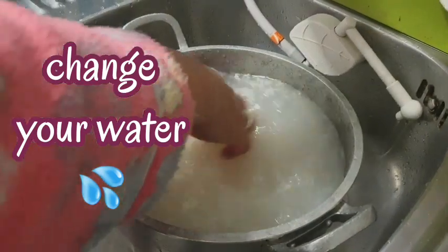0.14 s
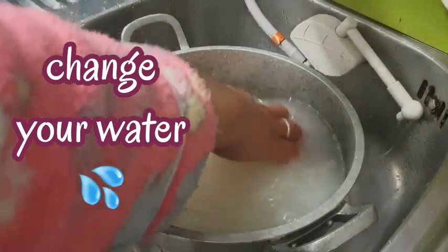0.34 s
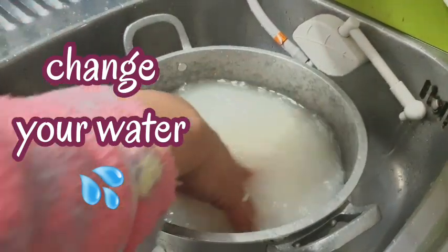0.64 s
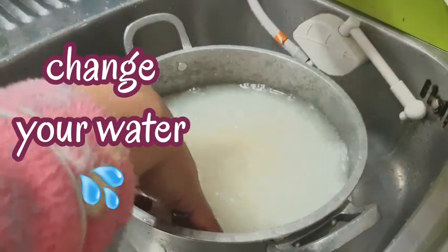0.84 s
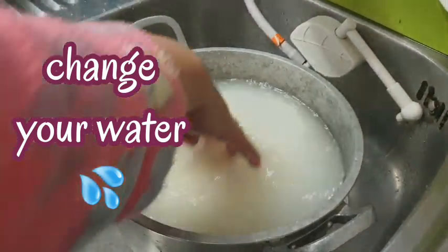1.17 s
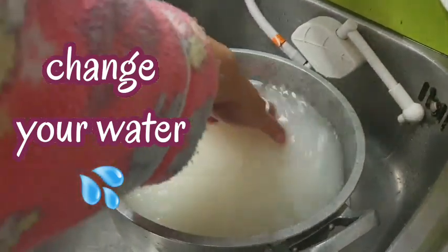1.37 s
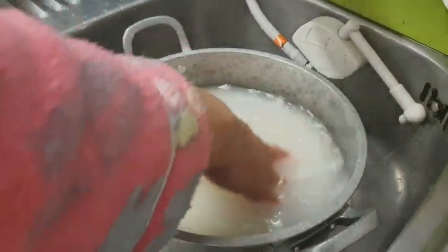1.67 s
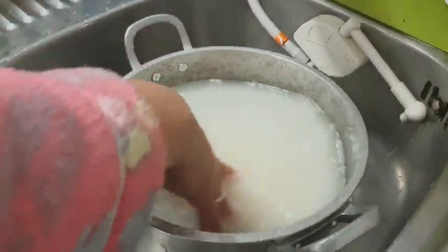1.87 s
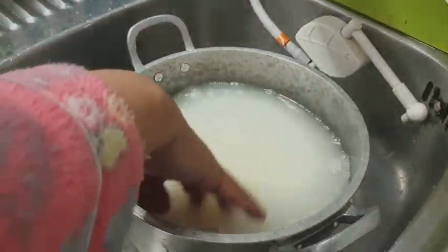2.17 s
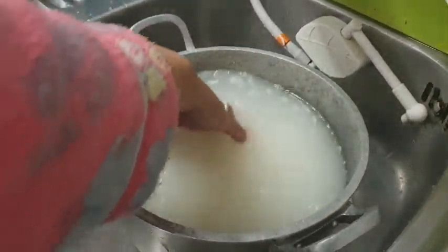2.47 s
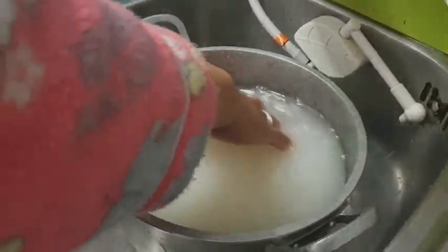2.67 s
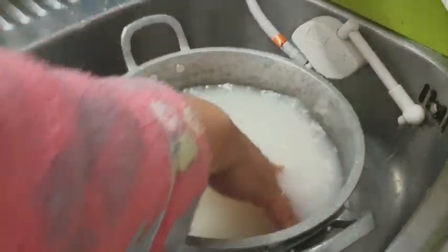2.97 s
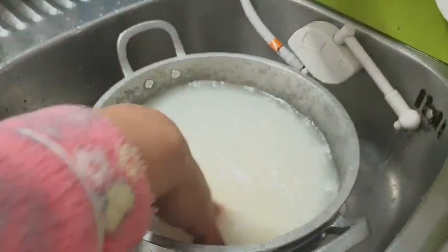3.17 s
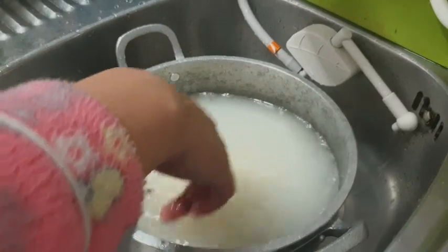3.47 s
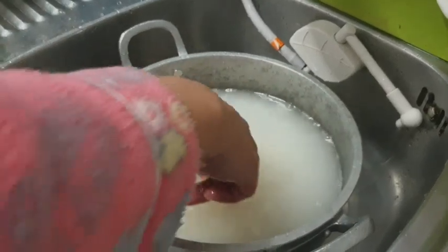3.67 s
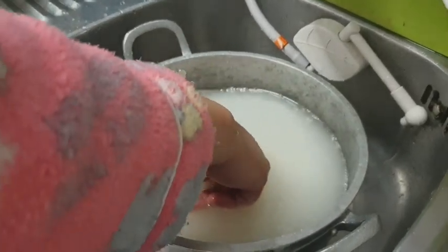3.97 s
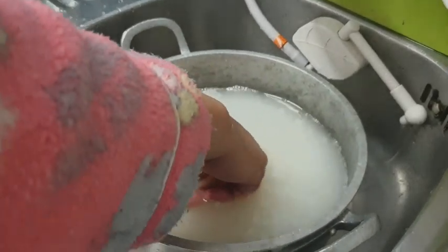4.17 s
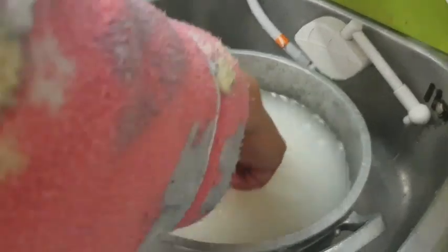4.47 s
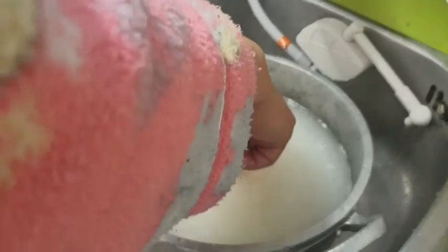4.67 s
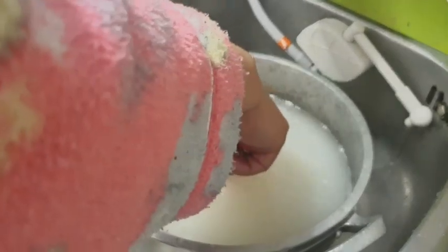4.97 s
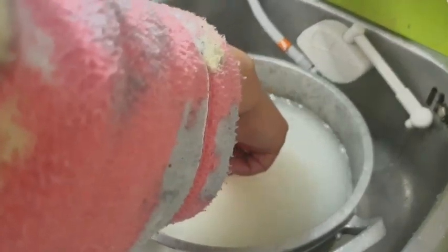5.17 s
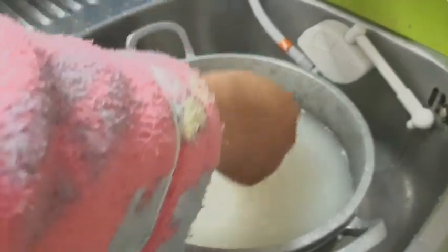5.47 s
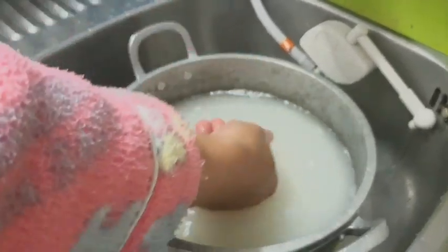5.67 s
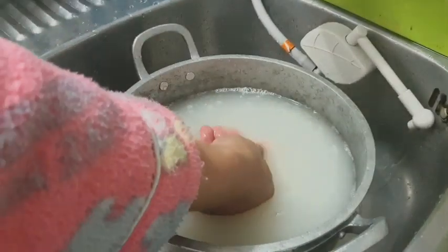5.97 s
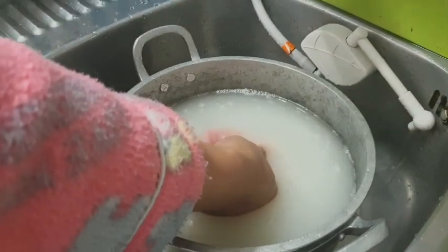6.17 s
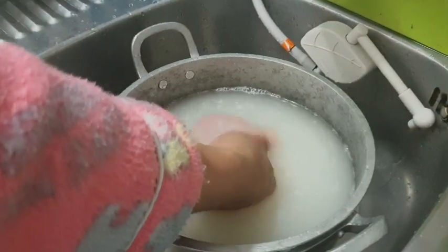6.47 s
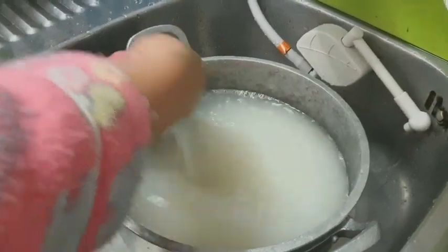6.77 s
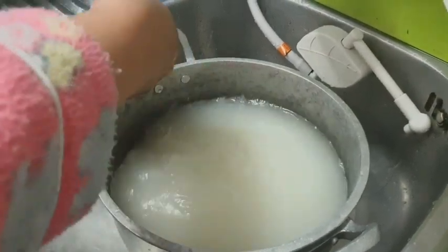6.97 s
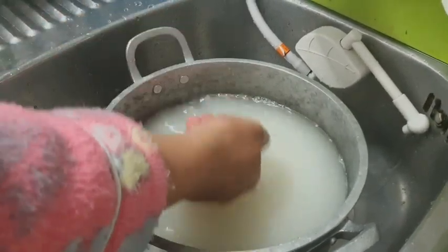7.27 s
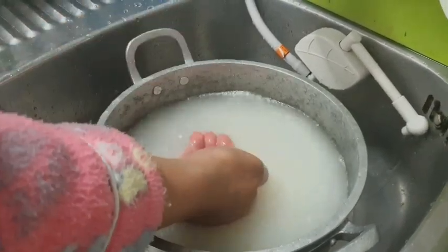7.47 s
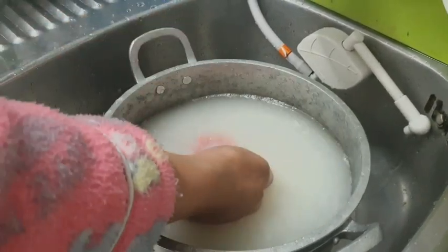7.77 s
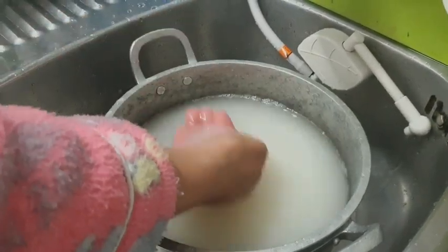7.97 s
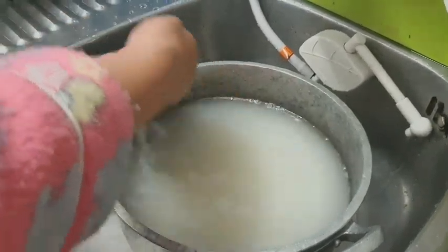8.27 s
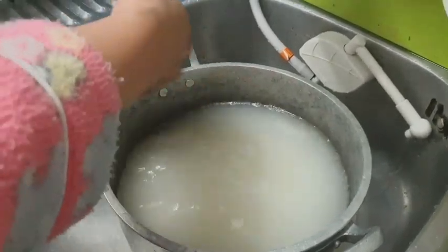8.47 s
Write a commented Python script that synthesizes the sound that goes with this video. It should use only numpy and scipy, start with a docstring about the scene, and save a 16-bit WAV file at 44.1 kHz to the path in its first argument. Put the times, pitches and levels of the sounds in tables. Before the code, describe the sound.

A hand stirs rice in a metal pot of water in a steel sink, heard close in a small kitchen. Quick irregular drops plink throughout over soft swishing and dull sink rumble. One sharp crack comes near the start, the middle is calmer with low thumps, then splashes cluster around seven seconds and a bright splash ends it.

```python
"""Kitchen: a hand stirs and squeezes rice in a metal pot of water in a steel sink, close to a two-port phone mic.
A steady trickle of drops plinks nearby (ringing bubbles) and thumps the sink (low modes).
Lifted handfuls splash (cracks, grainy noise, droplets) and spatter (more bubbles);
water swishes (flickering noise bands) over the hum of the kitchen (shaped noise)."""
import sys
import numpy as np
from scipy import signal
from scipy.fft import rfft, irfft
from scipy.io import wavfile
from scipy.ndimage import uniform_filter1d

SR = 44100
rng = np.random.default_rng(int(sys.argv[2]) if len(sys.argv) > 2 else 0)


def to_wav(sig):
    """Store sig (one row per channel, or 1-D mono) as 16-bit WAV at the path in sys.argv[1].

    Samples outside -1..1 are clipped; the rate is SR.
    """
    pcm = np.clip(np.atleast_2d(sig), -1, 1) * 32767
    pcm = np.round(pcm).astype(np.int16)
    wavfile.write(sys.argv[1], SR, pcm.T)  # frames by channels


N = 380141
TOP_HZ = 15900


def undb(db):
    """dB to amplitude."""
    return 10 ** (np.asarray(db) / 20)


def unit(x):
    """Scale to RMS 1."""
    return x / np.sqrt(np.mean(x ** 2))


def peak(x):
    """Scale to peak 1."""
    return x / np.max(np.abs(x))


def band(x, hz, width_hz):
    """Resonance of gain 1 at the centre."""
    return signal.lfilter(*signal.iirpeak(min(hz, .45 * SR), hz / width_hz, SR), x)


def between(x, lo_hz, hi_hz):
    """Butterworth bandpass."""
    return signal.sosfilt(signal.butter(2, [lo_hz, hi_hz], "bandpass", fs=SR, output="sos"), x)


def walk(rate_hz):
    """Random levels held 1 / rate_hz s and slewed; spread near 1."""
    k = int(SR / rate_hz)
    return uniform_filter1d(np.repeat(rng.standard_normal(N // k + 1), k), k)[:N]


def columns(table):
    """Interpolate each column over time."""
    s, *rest = np.transpose(table)
    return [np.interp(np.arange(N) / SR, s, c) for c in rest]


def add(track, s, sound):
    """Mix a sound in at s seconds."""
    i = int(s * SR)
    track[i:i + len(sound)] += sound[:max(N - i, 0)]


def fade(t60_s):
    """Time axis and exponential decay down to -60 dB."""
    t = np.arange(int(t60_s * SR)) / SR
    return t, np.exp(-np.log(1000) * t / t60_s)


def specks(rate_hz):
    """Sparse clicks of uneven size."""
    return (rng.random(N) < rate_hz / SR) * rng.standard_normal(N)


def bubble(hz, t60_s, rise, swell_s=0.00028):
    """Ringing air pocket: pitch climbs ever faster (rise = ln ratio) toward the surface, fading as it climbs."""
    t, decay = fade(t60_s)
    climb = np.exp(rise * (t / t[-1]) ** 2)
    whole = np.exp(-(climb - 1) ** 2)
    phase = 2 * np.pi * np.cumsum(np.minimum(hz * climb, .45 * SR)) / SR
    return np.sin(phase) * decay * whole * (1 - np.exp(-t / swell_s))


def hiss(db, top_db, low_hz, grain_rate_hz, grain_db, flicker_db):
    """Countless tiny surface bubbles: noise and specks, each band flickering mostly alone."""
    out, shared = 0, walk(40)
    for hz in low_hz * 2 ** np.arange(0, 2.1, .5):
        high = np.clip(np.log2(hz / 6500), 0, 1)
        source = rng.standard_normal((2, N)) + undb(grain_db) * unit(specks(grain_rate_hz))
        layer = unit(band(band(source, hz, hz / 2), hz, hz / 2))
        out = out + layer * undb(db + high * top_db + flicker_db * (shared / 2 + walk(60)))
    return out


def froth(db, rate_hz, level_db, low_hz):
    """Small bubbles over two octaves at random times, louder where db is higher."""
    out = np.zeros(N)
    for when, tone, size in rng.random((int(rate_hz * N / SR), 3)):
        hz = low_hz * 4 ** tone
        stir_db = db[int(when * N)]
        if stir_db > -90:
            add(out, when * N / SR, undb(stir_db + level_db + 14 * size) * bubble(hz, 35 / hz, .3))
    return out


BASIN_T60_S, BASIN_DB = 0.021, 5.5
ROOM_T60_S, ROOM_DB = 0.14, 0.5
RIGHT_LAG_S = .00009


def space(x, wet_db=0):
    """Direct sound, later at the right port, then basin echoes and room, different at each port."""
    response = np.zeros((2, SR // 2))
    for t60_s, db in ((BASIN_T60_S, BASIN_DB), (ROOM_T60_S, ROOM_DB)):
        decay = fade(min(t60_s, .48))[1]
        tail = rng.standard_normal((2, SR // 2))[:, :len(decay)] * decay
        response[:, 30:30 + len(decay)] += undb(db + wet_db) * tail / np.sqrt(np.sum(decay ** 2))
    response[0, 0] = 1
    response[1, :16] = np.sinc(np.arange(16) - RIGHT_LAG_S * SR)  # fractional delay
    return signal.fftconvolve(np.broadcast_to(x, (2, N)), response, axes=1)[:, :N]


# kitchen hum spectrum, relative: f/Hz, level/dB per Hz
KITCHEN_SPECTRUM = [(20, -10.5), (45, -8.5), (72, 1.5), (120, -3.5), (250, -14.5), (700, -20),
                    (1000, -22.5), (2200, -23), (3300, -29), (7000, -24.5), (9000, -29.5), (16000, -22)]
KITCHEN_DB, ALIKE_BELOW_HZ = -64, 1100


def kitchen():
    """Steady shaped noise; bass alike at both ports, treble unrelated."""
    hz = np.fft.rfftfreq(N, 1 / SR) + 1
    shape_hz, shape_db = np.transpose(KITCHEN_SPECTRUM)
    shape = undb(np.interp(np.log(hz), np.log(shape_hz), shape_db))
    mid, side = rfft(rng.standard_normal((2, N))) * shape
    side = side * np.clip(hz / ALIKE_BELOW_HZ, .16, 1)
    return unit(irfft(np.array([mid + side, mid - side]), N)) * undb(KITCHEN_DB)


# steel sink modes: f/Hz, width/Hz, level/dB
SINK_MODES = [(170, 40, 0), (290, 70, -8), (420, 70, -7), (520, 70, -6), (650, 120, -10), (800, 150, -14)]
KNOCKS_HZ, KNOCK_DB = 48, -3


def sink(rumble_db):
    """Basin modes driven by noise and sloshing knocks, each surging; a deep rumble follows the stir level."""
    surge_db = 3.5 * walk(10)
    knocks = undb(KNOCK_DB) * unit(specks(KNOCKS_HZ))
    modes = np.zeros(N)
    for hz, width_hz, db in SINK_MODES:
        drive = rng.standard_normal(N) + knocks
        mode = unit(band(band(drive, hz, width_hz), hz, width_hz))
        modes += undb(db + 3.16 * walk(12)) * mode
    deep = unit(between(rng.standard_normal(N), 31, 106))
    return undb(rumble_db - 6 + surge_db) * modes + undb(rumble_db - 4.0) * deep


# water lumps and knocks that shake the sink: t/s, level/dB, f/Hz
LUMP_HITS = [(0.946, -51.5, 523), (1.59, -49.5, 168), (3.499, -52.5, 496), (4.304, -41, 170.5),
             (4.728, -40.5, 165), (5.025, -47, 159), (5.55, -45, 177), (5.808, -53, 398),
             (6.254, -46, 157.6), (7.328, -48, 605), (7.022, -43, 171.5), (7.145, -42.5, 173),
             (7.301, -43, 518), (3.711, -56, 428), (4.672, -57, 534), (6.845, -51, 459),
             (7.888, -52.5, 425)]
LUMP_SWELL_CYCLES = 2.51


def lumps():
    """Low gulps that swell for a few cycles, peak and fade unevenly."""
    out = np.zeros(N)
    for s, db, hz in LUMP_HITS:
        swell_s = LUMP_SWELL_CYCLES / hz
        add(out, s - swell_s / 2, undb(db + 3.5) * bubble(hz, 0.12, 0.12, swell_s=swell_s))
    return out * undb(4 * walk(90))


# stirred water: t/s, swish level/dB, sink rumble level/dB
STIR_LEVELS = [(0, -67.5, -61), (.6, -68.5, -62), (1.5, -69, -68.5), (2.0, -65, -64), (3.2, -68.5, -66),
               (3.8, -70, -62), (4.1, -74, -63.5), (4.55, -79.5, -67.5), (5.1, -71, -62), (5.8, -76.5, -66),
               (6.5, -76, -63), (7.15, -65, -58), (7.5, -70, -64.5), (7.9, -77, -59.5), (8.2, -73.5, -66.5),
               (8.62, -55, -57.5)]


def stir():
    """Stirred water: swish noise, its froth of small bubbles, and the rumble of the sink."""
    swish_db, rumble_db = columns(STIR_LEVELS)
    swish = hiss(swish_db, -6, 3560, 300, -11.5, 2.26)
    return swish, froth(swish_db, 35, 2.5, 2534.0), sink(rumble_db)


# showers of spray off the moving hand: start t/s, hold/s, level/dB
SPRAY_SHOWERS = [(0, .42, -64), (1.157, .2, -71.5), (6.668, 0.31, -67), (7.128, 0.052, -58),
                 (8.317, 0.35, -72.5), (8.533, 0.021, -48), (8.56, .06, -57.5)]
SPRAY_RISE_DB_S, SPRAY_FALL_DB_S = 497, 292
MIST_DB, FIZZ_DB, GURGLE_DB = -1.5, 2.5, -3


def spray():
    """Droplets off the breaking surface: showers swell, hold and die as mist, fizz and lower gurgle."""
    t = np.arange(N) / SR
    showers_db = []
    for s, hold_s, top_db in SPRAY_SHOWERS:
        rise_db = SPRAY_RISE_DB_S * np.maximum(s - t, 0)
        fall_db = SPRAY_FALL_DB_S * np.maximum(t - s - hold_s, 0)
        showers_db.append(top_db - rise_db - fall_db)
    db = np.max(showers_db, axis=0)
    mist = hiss(db + MIST_DB, -6, 3500, 500, 0, 3)
    fizz = froth(db, 700, FIZZ_DB, 2000.)
    gurgle = froth(np.minimum(db, -60), 250, GURGLE_DB, 1200.)
    return mist, fizz + gurgle


# clear drops, each trapping a small bubble: t/s, level/dB
CLEAR_DROPS = [(0.3538, -40), (0.406, -42.5), (0.4625, -41.5), (0.4958, -42.5), (0.5916, -41.5),
               (0.7033, -45), (0.8116, -40.5), (0.8356, -42.5), (0.9406, -43.5), (1.0276, -44.5),
               (1.1225, -47), (1.1863, -43.5), (1.2082, -47.5), (1.269, -42.5), (1.4006, -45),
               (1.5835, -48.5), (1.6541, -43.5), (1.7972, -44.5), (1.8609, -42), (1.9005, -45.5),
               (1.9731, -40.5), (2.0213, -41.5), (2.044, -42.5), (2.0887, -38.5), (2.159, -47.5),
               (2.171, -38.5), (2.2491, -42), (2.332, -41.5), (2.3404, -36), (2.406, -40.5),
               (2.4495, -45.5), (2.5, -40.5), (2.5569, -43.5), (2.572, -42), (2.67, -48.5), (2.8421, -45),
               (2.8624, -44), (2.9726, -45.5), (3.0697, -45), (3.1757, -47), (3.2276, -43), (3.242, -41),
               (3.2966, -48), (3.46, -32.5), (3.515, -46), (3.604, -48), (3.7058, -46.5), (3.9392, -45),
               (3.9897, -41), (4.0831, -48), (4.201, -56), (4.2245, -48.5), (4.2995, -51.5), (4.6655, -47),
               (4.683, -50.5), (4.9507, -40.5), (5.1243, -42.5), (5.1734, -39.5), (5.249, -39.5),
               (5.3759, -43), (5.444, -38), (5.5493, -44), (5.647, -42.5), (5.691, -40), (5.7119, -39),
               (5.8002, -44.5), (5.9234, -49), (5.9372, -42), (6.0521, -45), (6.0691, -39.5), (6.1594, -41),
               (6.2497, -46), (6.374, -45), (6.446, -30), (6.5311, -39.5), (6.5475, -37.5), (6.6179, -49),
               (6.635, -41), (7.267, -39.5), (7.4318, -41), (7.4919, -41), (7.5456, -40.5), (7.565, -46),
               (7.649, -44.5), (7.766, -49), (7.7933, -40.5), (7.878, -46.5), (7.9932, -47.5),
               (8.0327, -47.5), (8.1224, -41.5), (8.2422, -45), (8.3803, -46), (8.3992, -41),
               (8.5022, -40.5)]
# trickle bubble pitch, sagging slowly and jumping back up: t/s, f/Hz
TRICKLE_PITCH = [(0, 3350), (.95, 3295), (1.1, 3540), (1.2, 3150), (2.35, 2795), (2.41, 2710), (3.0, 2850),
                 (3.3, 2420), (3.44, 3410), (3.72, 2606), (3.92, 3235), (4.3, 2620), (4.7, 2930),
                 (4.93, 4160), (5.55, 3980), (5.66, 3805), (6.2, 3930), (6.63, 3665), (7.8, 3216),
                 (8.13, 2844), (8.5, 2510)]
# drops shaken off the hand: t/s, level/dB, bubble f/Hz
HAND_SPATTER = [(0.007, -45, 3300), (0.148, -48, 2450), (0.015, -43, 3680), (0.067, -40.5, 3380),
                (0.0933, -43, 3750), (0.108, -42, 2540), (0.1212, -39, 3410), (0.1333, -38, 3760),
                (0.996, -41, 4270), (6.675, -41.5, 3090), (6.7196, -49, 3730), (6.814, -41, 4100),
                (6.8427, -44.5, 3700), (6.8694, -34.5, 2840), (6.971, -41.5, 3780), (7.089, -41, 3350),
                (7.104, -25, 4540), (7.1799, -32, 3140), (7.221, -42, 4240), (7.3031, -23.5, 4230),
                (7.374, -30.5, 4130), (8.047, -53, 2040), (8.1444, -43, 3920), (8.29, -40, 4030),
                (8.336, -35, 3280), (4.794, -56, 2140), (1.311, -45, 5200), (5.017, -56, 3080),
                (1.466, -46.5, 5500), (1.342, -51, 2630), (6.705, -46, 4700), (6.773, -43, 3680),
                (6.908, -46.5, 1890), (8.472, -45, 4570), (8.5392, -27, 3290), (8.547, -27, 4050),
                (8.551, -31, 6020), (8.58, -32, 3320)]
PAIR_GAP_S, PAIR_LIFT = .04, 1.07  # a drop right behind another traps a smaller, higher bubble


def trickle():
    """Rows (t/s, level/dB, f/Hz): clear drops pitched by the trickle, then hand spatter."""
    s, db = np.transpose(CLEAR_DROPS)
    lift = np.where(np.diff(s, prepend=0) < PAIR_GAP_S, PAIR_LIFT, 1)
    hz = np.interp(s, *np.transpose(TRICKLE_PITCH)) * lift
    return np.vstack([np.transpose([s, db, hz]), HAND_SPATTER])


DROP_T60_S, DROP_RISE, DROP_SPREAD = .021, 0.084, .07
DROP_TICK_DB, THUMP_DB, SATELLITE_DB, PARTNER_DB, OVERTONE_DB = -6, -13.5, -18.5, -8.5, -17


def drops():
    """Each drop ticks, rings a bubble and a beating partner, is chased by a droplet, rings one sink mode."""
    plink, thump = np.zeros(N), np.zeros(N)
    tick = np.diff(np.hanning(12), prepend=0) + 0.84 * np.hanning(12)
    rows = trickle()
    chance, pick = rng.standard_normal((len(rows), 6)), rng.random((len(rows), 2))
    for (s, db, hz), c, u in zip(rows, chance, pick):
        add(plink, s, undb(db) * bubble(hz, DROP_T60_S * np.exp(0.23 * c[0]), DROP_RISE))
        partner_hz = hz * (1 + DROP_SPREAD * c[4])
        add(plink, s, undb(db + PARTNER_DB) * bubble(partner_hz, DROP_T60_S, DROP_RISE))
        add(plink, s, undb(db + OVERTONE_DB) * bubble(2 * hz, DROP_T60_S / 2, DROP_RISE))
        add(plink, s, undb(db + DROP_TICK_DB) * tick)
        late_s = 0.0059 + 0.034 * u[0]
        satellite_hz = hz * (PAIR_LIFT + DROP_SPREAD * c[2] / 2)
        satellite_db = db + SATELLITE_DB + 7.8 * c[1]
        add(plink, s + late_s, undb(satellite_db) * bubble(satellite_hz, DROP_T60_S, DROP_RISE))
        mode_hz = SINK_MODES[int(u[1] * (len(SINK_MODES) - 1))][0] * (1 + DROP_SPREAD * c[5])
        thump_db = min(db, -42) + THUMP_DB + 2 * c[3]
        add(thump, s, undb(thump_db) * bubble(mode_hz, .07, .1, swell_s=.002))
    return plink, thump


# larger bubbles: t/s, level/dB, f/Hz, t60/s, pitch rise over the ring/ln ratio
LARGE_BUBBLES = [(0.259, -51.5, 1280, 0.08, 0.66), (0.754, -53.5, 1033, 0.068, 0.47),
                 (1.202, -48, 895, 0.14, 0.27), (1.234, -45, 970, 0.031, 0.37),
                 (1.173, -60, 1058, 0.17, 0.05), (1.337, -48.5, 1190, 0.026, 0.31),
                 (1.701, -47, 796, 0.034, 0.3), (2.191, -38, 2170, 0.014, 0.18),
                 (5.292, -51.5, 1280, 0.027, 0.38), (5.612, -33.5, 1504, 0.034, 0.36),
                 (6.868, -39, 1445, 0.022, 0.41), (6.885, -33, 2103, 0.039, 0.3),
                 (7.181, -29.5, 574, 0.024, 0.42), (7.359, -34, 2070, 0.036, 0.34),
                 (8.324, -50.5, 2260, 0.1, 0.3), (8.437, -45, 1695, 0.11, 1),
                 (3.373, -47.5, 531, 0.13, 12.5), (7.033, -51, 788, 0.1, 4.8),
                 (7.121, -40.5, 1230, 0.13, 9), (0.885, -59.5, 822, 0.62, 0.045),
                 (6.945, -56, 792, 0.23, 0.055)]


def bubbles():
    """Gulps of air dragged under by the hand; the churning water makes them waver."""
    out = np.zeros(N)
    for s, db, hz, t60_s, rise in LARGE_BUBBLES:
        add(out, s, undb(db) * bubble(hz, t60_s, rise, swell_s=1.32 / hz))
    return out * undb(3 * walk(120))


# water slaps on water and steel: t/s, level/dB, brightest f/Hz, dull part/dB re level, t60/s
WATER_SLAPS = [(0.181, -23.5, 6330, -7.5, 0.011), (0.3118, -6, 5760, -53, 0.0078),
               (0.494, -48, 5640, 11, 0.017), (1.7776, -41, 6740, -25, 0.028),
               (2.496, -41, 6530, -12, 0.02), (3.455, -62.5, 7600, 19, 0.039),
               (4.0268, -49, 5740, -19, 0.1), (5.091, -49, 6460, -21, 0.089), (5.609, -49, 6360, 6.5, 0.03),
               (6.917, -40.5, 7500, 2.5, 0.17), (6.9633, -37, 5800, -11, 0.045),
               (6.986, -34, 12000, -8, 0.014), (7.102, -28.5, 4600, 0.5, 0.014),
               (7.162, -32.5, 5340, -10, 0.074), (7.179, -28, 4060, -1, 0.035),
               (7.2, -29, 10500, -14, 0.0097), (7.3022, -30.5, 5130, -32, 0.03),
               (7.358, -25.5, 5260, 5.5, 0.017), (7.3885, -30, 5800, -7, 0.027),
               (7.431, -32.5, 10300, -22, 0.025), (7.732, -49.5, 13400, -13.5, 0.032),
               (8.3797, -34.5, 7300, -24, 0.027), (8.4362, -43.5, 5550, 2.5, 0.081),
               (8.509, -36.5, 5500, -6.5, 0.075), (8.548, -23.5, 5200, -8, 0.038)]
CRACK_DB, SLAP_TOP_DB, SHOWER_GRAIN_DB = 5.5, -7, 7
DROPLET_DB, DROPLET_CYCLES, DROPLET_SPREAD = 5, 5.7, .4  # separate droplets thrown up by a slap


def dull(x):
    """Duller part of a slap."""
    return between(between(x, 2170, 6800), 1500, TOP_HZ)


def thin(x, hz):
    """Strip the lows an octave below hz."""
    return between(between(x, hz / 2, TOP_HZ), hz / 2, TOP_HZ)


def slaps():
    """Sharp crack, then a grainy shower brightest round one pitch, a duller part and scattered droplets."""
    crack, shower = np.zeros(N), np.zeros((2, N))
    thrown = rng.random((len(WATER_SLAPS), 16, 3))
    noises = rng.standard_normal((len(WATER_SLAPS), 2, SR // 5))
    grain = undb(SHOWER_GRAIN_DB * walk(400))
    front = signal.unit_impulse(256)
    for (s, db, hz, dull_db, t60_s), noise, flock in zip(WATER_SLAPS, noises, thrown):
        decay = fade(min(t60_s, .19))[1]
        snap = between(front, 6400, TOP_HZ) / 2 + thin(band(front, hz, .5 * hz), hz)
        add(crack, s, undb(db + CRACK_DB) * peak(snap))
        add(crack, s, undb(db + dull_db + CRACK_DB) * peak(dull(front)))
        patchy = decay * grain[int(s * SR):][:len(decay)]
        patchy = patchy * np.sqrt(np.sum(decay ** 2) / np.sum(patchy ** 2))  # same energy as the plain decay
        for port in range(2):
            wet = noise[port, :len(decay)] * patchy
            bright = thin(band(band(wet, hz, hz / 2), hz, hz / 2), hz)
            bright = bright + undb(SLAP_TOP_DB) * between(wet, 5140, TOP_HZ)
            add(shower[port], s + 0.00045, undb(db) * bright + undb(db + dull_db - 0.5) * dull(wet))
        for late, tone, size in flock:
            drop_hz = hz * np.exp(DROPLET_SPREAD * (2 * tone - 1))
            drop_db = db + max(dull_db, 0) + DROPLET_DB - 30 * late - 12 * size
            droplet = bubble(drop_hz, DROPLET_CYCLES / drop_hz, 0.16)
            add(crack, s + late * t60_s / 2, undb(drop_db) * droplet)
    return crack, shower


PLINK_WET_DB, SLAP_WET_DB = -5, -3.5


def scene():
    """Mix all layers at the two ports."""
    swish, stir_froth, rumble = stir()
    mist, fizz = spray()
    plink, thump = drops()
    crack, shower = slaps()
    rings = plink + bubbles() + fizz + stir_froth
    boom = thump + lumps() + rumble
    # long waves reach both ports almost alike
    apart = undb(-11.5) * between(space(boom)[0], 310, 1100) * [[1], [-1]]
    splash = space(crack + shower, SLAP_WET_DB)
    return space(rings, PLINK_WET_DB) + splash + swish + mist + boom + apart + kitchen()


def record(dry):
    """The phone cuts the top."""
    return signal.sosfilt(signal.ellip(10, .2, 70, TOP_HZ, fs=SR, output="sos"), dry)


dry = scene()
out = record(dry)
to_wav(out)
```